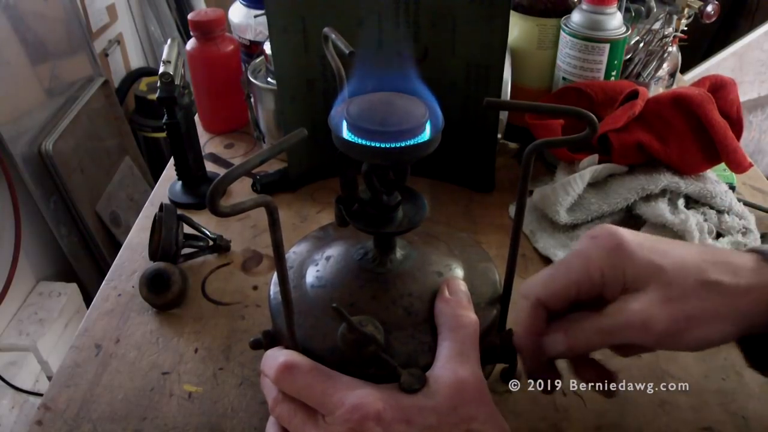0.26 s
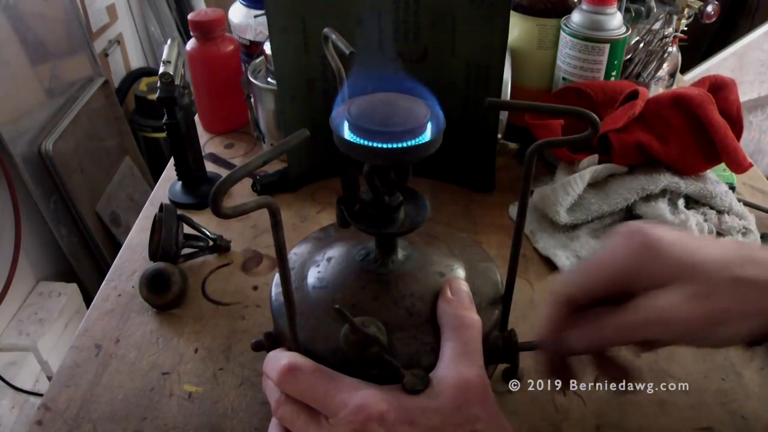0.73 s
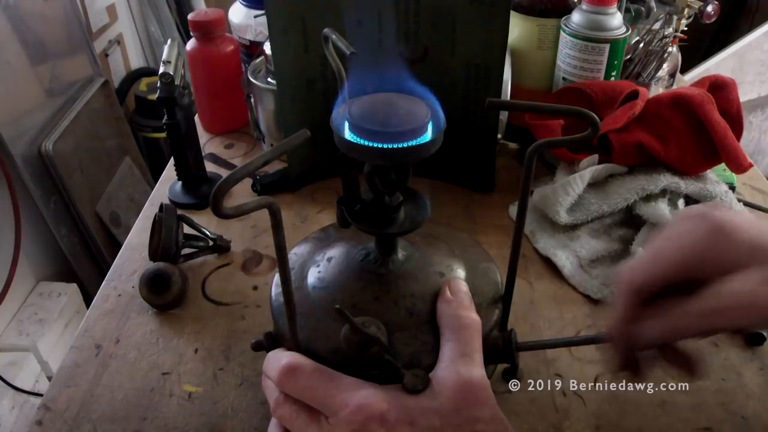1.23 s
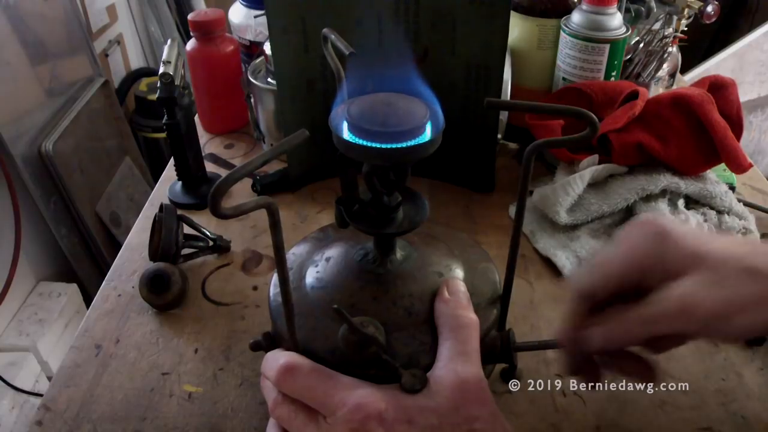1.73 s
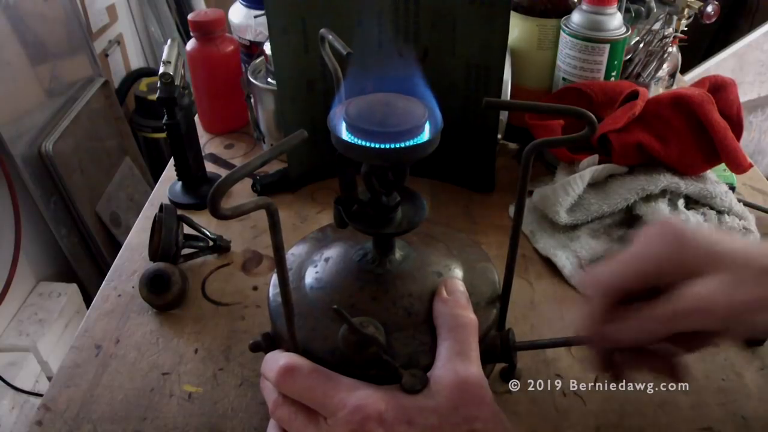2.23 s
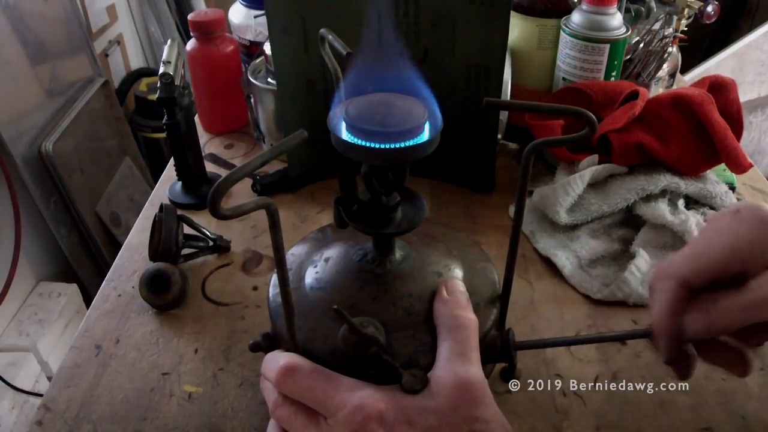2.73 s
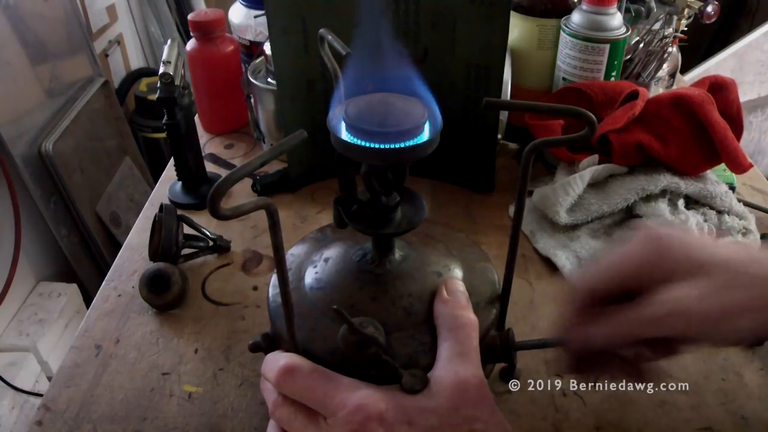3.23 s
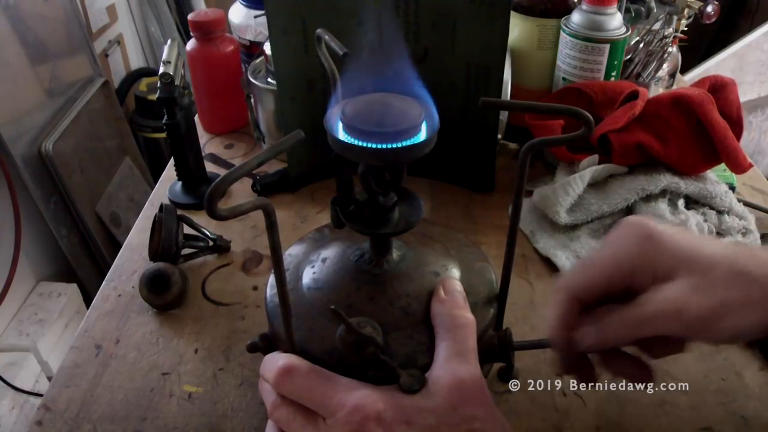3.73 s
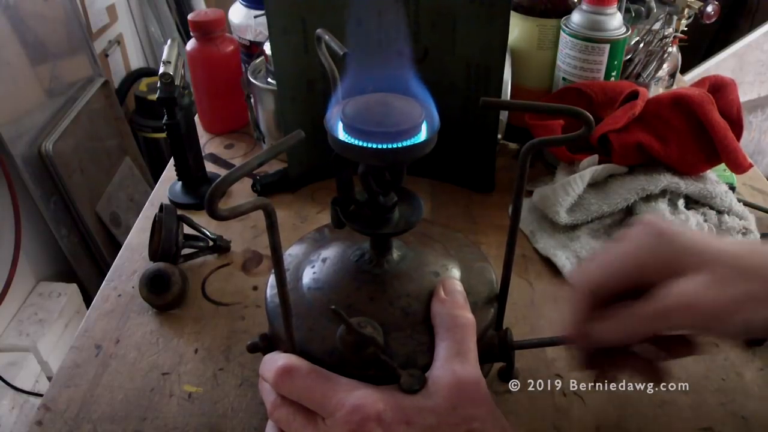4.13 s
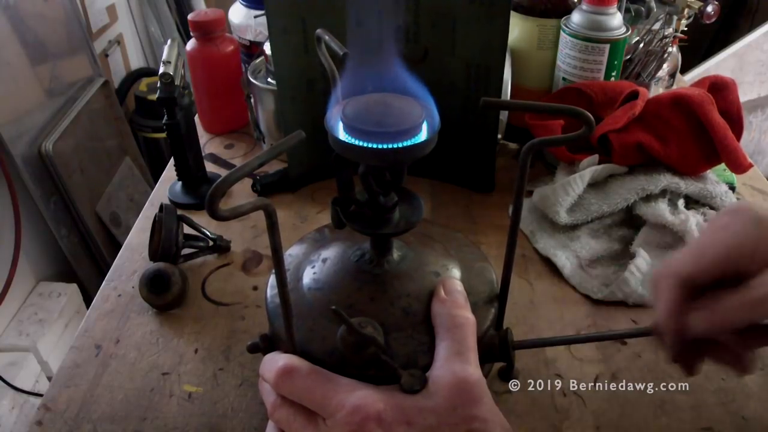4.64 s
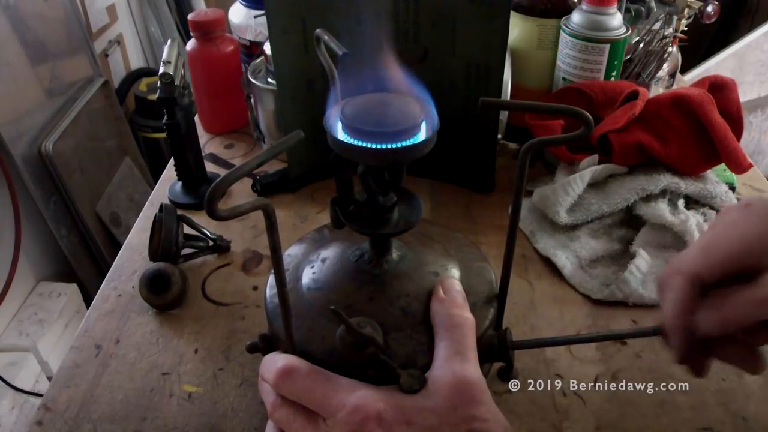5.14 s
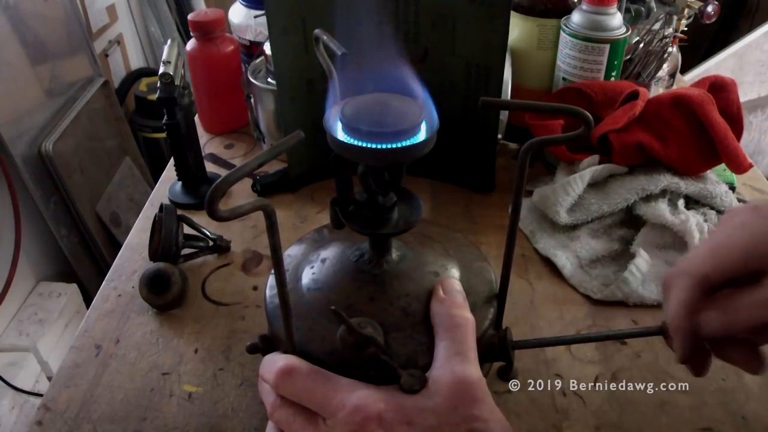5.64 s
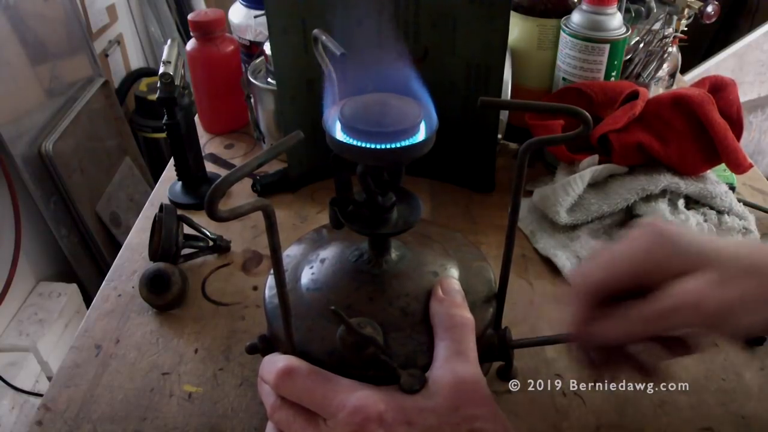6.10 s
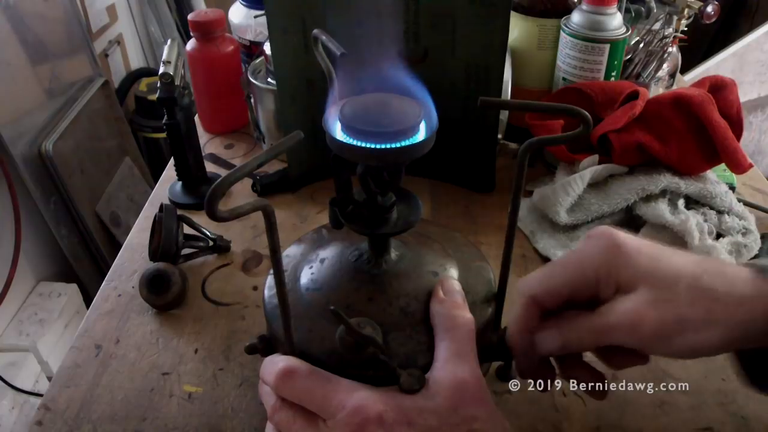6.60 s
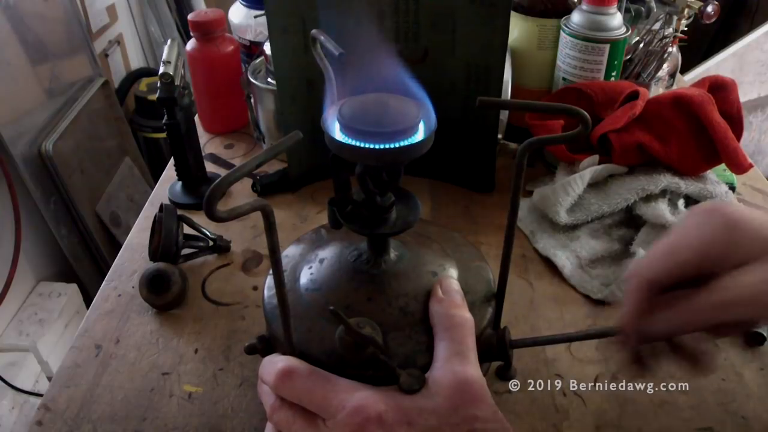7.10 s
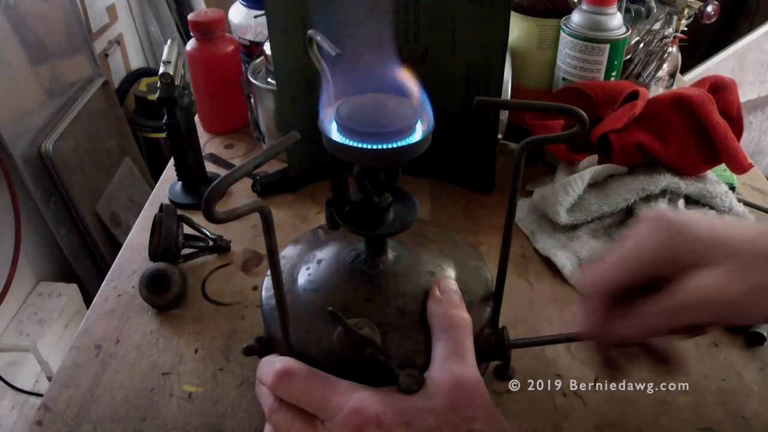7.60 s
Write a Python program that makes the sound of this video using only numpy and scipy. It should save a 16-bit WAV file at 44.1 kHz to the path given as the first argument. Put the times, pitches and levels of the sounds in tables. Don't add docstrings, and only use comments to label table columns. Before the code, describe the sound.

A loose pump rod rattles in its cap and guide, each contact chattering briefly and ringing the hollow tank, thin legs and tube. Strokes are quick and uneven: loud near the start, lighter ticking through the middle, hard clacks again near the end. Steady quiet burner hiss grows slightly over soft rumble; one close microphone, short room reflections, centred sound.

```python
import sys
import numpy as np
from scipy import signal
from scipy.fft import rfft, irfft, next_fast_len
from scipy.io import wavfile
from scipy.ndimage import uniform_filter1d, map_coordinates

SR = 44100
rng = np.random.default_rng(int(sys.argv[2]) if len(sys.argv) > 2 else 0)


def ratio(d):
    e = np.asarray(d, float) / 20
    return 10 ** e


def output_pcm(signal):
    pcm = np.clip(np.atleast_2d(signal).T, -1, 1) * 32767
    wavfile.write(sys.argv[1], SR, np.round(pcm).astype(np.int16))


N = 346626


def unit(x):
    return x / np.sqrt(np.mean(x ** 2) + 1e-20)


def along(points, hz):
    f, v = np.transpose(points)
    return np.interp(np.log(hz + 1), np.log(f + 1), v)


def wobble(rate):
    knots = rng.standard_normal(int(N * rate / SR) + 4)
    return map_coordinates(knots, [np.arange(N) * rate / SR])


def noise(gain, size=N):
    m = next_fast_len(size)
    spectrum = rfft(rng.standard_normal(m)) * gain(np.fft.rfftfreq(m, 1 / SR))
    return unit(irfft(spectrum, m)[:size])


def peaks(rows, hz):
    return np.sqrt(sum(ratio(db) ** 2 / (1 + (2 * (hz - c) / w) ** 2) for c, w, db in rows))


def band(lo_hz, hi_hz):
    return lambda hz: 1 / np.sqrt((1 + (lo_hz / (hz + 1)) ** 24) * (1 + (hz / hi_hz) ** 24))


def blank(seconds):
    t = np.arange(int(seconds * SR)) / SR
    return t, np.zeros(N + len(t))


def add_at(track, start_s, sound):
    track[max(round(start_s * SR), 0):][:len(sound)] += sound


# pitch_hz, t60_s
ROOM_DECAY = [(200, 0.4), (2000, 0.4), (10000, 0.23)]


def shop(x):
    hz, t, z = signal.stft(rng.standard_normal(SR // 2), SR, nperseg=256)
    fading = z * ratio(-60 * t / along(ROOM_DECAY, hz)[:, None])
    tail = signal.istft(fading, SR, nperseg=256)[1]
    late = np.pad(x, (300, 0))
    return signal.fftconvolve(late, tail / np.linalg.norm(tail))[:N]


# start_s, level_db
JET_LEVEL = [(0.0, -47.5), (1.09, -48), (2.49, -46), (3.63, -46.5), (3.98, -46.5), (4.14, -45.5),
             (5.51, -44), (6.87, -44.5), (7.11, -42), (7.35, -44.5), (7.86, -42.5)]
# pitch_hz, level_db (per Hz)
JET_COLOUR = [(700, -11), (1000, -7.5), (1300, -16.5), (1560, -9), (2300, -9.5), (3300, -6.5), (5000, -6.5),
              (5500, 0), (6700, -2), (8000, -1), (9200, 0), (9900, -12.5), (11500, -11), (15000, -18.5)]
# pitch_hz, width_hz, level_db (not used)
BURNER_CAVITIES = [(2456, 62, -8), (2776, 12, -10), (3350, 170, -8), (4130, 57, -8), (4520, 33, -9),
                   (5540, 14, -7), (6000, 20, -4), (5950, 17, -2), (6060, 21, -6), (6270, 36, -3),
                   (7140, 160, -2), (8150, 130, 0), (7940, 56, -4), (8840, 81, -3), (9090, 61, 0),
                   (9760, 39, -10), (10200, 15, -14), (13400, 93, -17)]
# pitch_hz, level_db (per Hz)
ROAR_COLOUR = [(8, -2), (30, 4.5), (45, -4), (62, -2), (80, -13), (120, -6.5), (160, -10), (260, -6.5),
               (400, -18), (900, -16), (1250, -39), (1600, -72)]
ROAR_DB = -55.5


def burner():
    cavities = [(c, w, 0) for c, w, _ in BURNER_CAVITIES]
    colour = lambda hz: ratio(along(JET_COLOUR, hz)) * (.8 + 1.2 * peaks(cavities, hz))
    start_s, level_db = np.transpose(JET_LEVEL)
    jet_db = np.interp(np.arange(N) / SR, start_s, level_db)
    jet = ratio(jet_db - 0.43 + 0.58 * wobble(3.27) + 1.1 * wobble(25)) * noise(colour)
    roar = ratio(ROAR_DB + 0.4 * wobble(3.71)) * noise(lambda hz: ratio(along(ROAR_COLOUR, hz)))
    return jet + roar


# start_s, level_db
BENCH_PUSHES = [
    (3.421, -56),
    (5.552, -58),
    (6.619, -62),
    (6.799, -56),
    (7.53, -50),
]


def thuds():
    t, out = blank(.3)
    for s, db in BENCH_PUSHES:
        swell_and_fade = ratio(db + 7 - 60 * t / 0.27) * (1 - np.exp(-t / 0.013))
        add_at(out, s, swell_and_fade * noise(band(42, 196), size=len(t)))
    return out[:N]


# pitch_hz, level_db, t60_s
TUBE_MODES = [(2735, -4, .07), (2905, 0, .06), (3065, -1, .055), (3235, -1, .06)]
TANK_MODES = [(665, -6, .07), (780, -7, .06), (886, -6, .04), (990, -4, .07), (1065, -6, .05),
              (1200, -8, .035)]
LEG_MODES = [(1555, -6, .07), (1605, -3, .07), (1690, -7, .08), (1790, -5, .07), (1957, -1, .07),
             (2075, 0, .06), (2200, -6, .06), (2303, -4, .06), (2470, -9, .05)]
BENCH_MODES = [(240, -4, .08), (345, -1, .09), (470, -2, .07), (570, -2, .09)]
# peak_s, level_db, tank_share_db
PLUNGER_DRAGS = [(0.0, -27, -24), (0.13, -40, -9.5), (0.55, -43, -19), (0.72, -40, -10), (1.4, -50, -7),
                 (1.87, -40, -11.5), (2.22, -41, -12), (2.5, -43, -9), (1.92, -59, -12), (2.14, -41.5, -9),
                 (2.56, -42, -10.5), (3.0, -53, 1), (3.75, -43.5, -7.5), (4.15, -42.5, -10),
                 (4.73, -42, -21), (4.88, -42.5, -6.5), (5.34, -42.5, -8.5), (5.58, -43, -8),
                 (5.72, -46, -4.5), (5.87, -36, -7.5), (6.5, -61, 9), (6.86, -49, -14), (7.03, -39, -13.5),
                 (7.181, -34.5, -12), (7.33, -50, 4.5), (7.6, -47, -6), (7.75, -56.5, 1)]
DRAG_FADE_DB_PER_S, DRAG_REST_DB = 125, -72


def slide():
    t = np.arange(N) / SR
    legs_db = np.full(N, float(DRAG_REST_DB))
    tank_db = legs_db.copy()
    for s, db, share in PLUNGER_DRAGS:
        near_db = db - DRAG_FADE_DB_PER_S * np.abs(t - s)
        legs_db = np.maximum(legs_db, near_db)
        tank_db = np.maximum(tank_db, near_db + share)

    def hum(modes, width_hz):
        rows = [(c, width_hz, db) for c, db, _ in modes]
        return noise(lambda hz: peaks(rows, hz) ** 2)

    grip = ratio(2.5 * wobble(40) + 4 * wobble(350))
    legs = ratio(legs_db - 11.5) * unit(grip * hum(LEG_MODES + TUBE_MODES, 110))
    tank = ratio(tank_db - 5.5) * unit(grip * hum(TANK_MODES + BENCH_MODES[1:], 47))
    return legs + tank


def struck(t, modes, clatter, best_hz, chatter, blur, rise=0.00025, spread_db=0.0):
    early = t < .02
    hz, mode_db, t60 = np.repeat(modes, 3, axis=0).T[:, :, None]
    draw = rng.standard_normal((3, len(hz), 1))
    aim_db = -np.minimum(np.abs(np.log(hz / best_hz)) * 130, 12) if best_hz else 0
    level = ratio(mode_db + aim_db + spread_db * draw[0] - 60 * t / t60)
    partials = level * np.sin(2 * np.pi * hz * (1 + blur * draw[1]) * t + np.pi * draw[2])
    ring = partials.sum(0) * (1 - np.exp(-t / (0.28 * chatter)))

    lo, hi, dense_db, dense_t60 = clatter
    jitter = uniform_filter1d(rng.standard_normal(len(t)), size=60) * np.sqrt(60)
    bounces = ratio(4.2 * jitter * np.exp(-t / chatter))
    fade = ratio(-60 * np.maximum(t - chatter / 2, 0) / dense_t60)
    dense = noise(band(lo, hi), size=len(t)) * bounces * (1 - np.exp(-t / rise)) * fade
    part = ring / np.std(ring[early]) + ratio(dense_db) * dense / np.std(dense[early])
    return part / np.std(part[early])


# start_s, pitch_hz, level_db
LOOSE_NOTES = [(0.0, 550, -45), (0.396, 345, -50), (0.9, 333, -50.5), (1.185, 1973, -40),
               (1.699, 3548, -32), (1.745, 337, -49), (2.094, 4520, -39), (2.43, 3270, -34),
               (2.803, 4050, -36), (3.98, 3970, -40), (4.111, 1580, -47.5), (4.329, 2590, -43.5),
               (4.82, 2110, -48), (4.831, 1560, -53), (5.379, 1750, -47.5), (5.54, 1560, -38),
               (6.801, 350, -45.5), (0.362, 1597, -37), (0.655, 3080, -26), (0.68, 585, -41),
               (1.001, 1610, -41), (1, 1273, -43), (2.149, 1610, -51), (3.72, 2080, -55),
               (5.797, 1512, -29), (6.416, 3620, -32), (6.803, 2115, -33), (7.535, 1290, -30.5),
               (7.536, 2068, -25.5), (0.0, 2140, -45), (0.51, 2055, -43), (0.656, 1647, -22.5),
               (0.656, 1105, -34), (0.656, 1310, -34), (0.999, 2090, -33.5), (1.699, 3770, -48),
               (2.262, 2907, -44), (2.428, 3990, -34), (3.115, 1590, -55), (4.72, 4100, -51),
               (4.885, 3050, -47), (5.214, 2915, -38), (5.328, 1546, -45), (5.54, 2276, -34),
               (5.799, 1240, -40.5), (6.153, 1605, -38.5), (6.414, 1790, -28), (1.699, 3200, -50),
               (5.213, 4170, -40.5), (6.488, 2500, -53), (6.803, 1613, -30), (6.803, 2275, -25),
               (6.802, 1270, -33.5), (7.15, 1100, -37), (7.326, 1060, -49), (6.565, 1070, -50),
               (7.538, 1640, -36), (7.536, 2291, -31.5), (5.539, 1240, -39), (5.797, 3010, -41),
               (1.391, 1654, -52)]
PING_WIDTH = .045


def pings():
    t, out = blank(.2)
    for s, hz, db in LOOSE_NOTES:
        t60 = .04 if 1050 < hz < 1400 else .085
        rattle = (hz * (1 - PING_WIDTH), hz * (1 + PING_WIDTH), 0, t60)
        note = struck(t, [(hz, 0, t60)], rattle, 0, chatter=0.0097, blur=0.0017)
        add_at(out, s, ratio(db - 2.5) * note)
    return out[:N]


# start_s, tank_db, near_leg_db, far_leg_db, leg_brace_db
BODY_RINGS = [(0.0, -52, -53, -52, -58), (0.361, -60, -56, -54, -56), (0.509, -78, -51, -64, -78),
              (0.654, -39, -48, -38, -44), (0.761, -55, -62, -63, -60), (0.998, -56, -62, -62, -59),
              (1.184, -78, -50, -62, -78), (1.433, -61, -78, -71, -78), (1.698, -60, -61, -78, -67),
              (1.84, -65, -62, -56, -74), (2.094, -60, -78, -78, -78), (2.263, -55, -72, -54, -78),
              (2.43, -57, -57, -59, -78), (2.577, -63, -72, -78, -78), (2.805, -60, -53, -67, -78),
              (3.193, -78, -60, -62, -78), (3.392, -60, -78, -78, -78), (3.979, -56, -56, -68, -78),
              (4.1, -78, -65, -72, -59), (4.528, -57, -63, -66, -78), (4.719, -68, -54, -78, -78),
              (5.212, -63, -57, -78, -78), (5.328, -59, -61, -71, -60), (5.539, -58, -52, -52, -52),
              (5.797, -49, -60, -53, -58), (6.15, -78, -63, -61, -58), (6.26, -68, -55, -64, -78),
              (6.415, -45, -47, -54, -54), (6.565, -55, -55, -78, -74), (6.8, -54, -50, -42, -46),
              (6.978, -74, -55, -70, -66), (7.149, -43, -48, -47, -56), (7.325, -58, -65, -65, -78),
              (7.534, -50, -43, -42, -44), (7.717, -78, -54, -78, -71)]
# pitch_hz, split_hz, t60_s, phase_waver_rad
BODY_LONG_MODES = [
    (887, 3, .36, .12),
    (1957, 7, .16, .45),
    (2170, 9, .2, .35),
    (1648, 9, .28, .4),
]
# start_s, pump_tube_db, pump_leg_db
PUMP_RINGS = [(0.0, -57, -51), (0.361, -61, -62), (0.509, -78, -57), (0.654, -42, -50), (0.761, -61, -66),
              (0.998, -78, -58), (1.184, -78, -61), (1.698, -56, -78), (2.263, -55, -70), (4.1, -66, -59),
              (5.212, -57, -78), (5.328, -68, -60), (5.539, -59, -61), (5.797, -53, -54), (6.415, -56, -55),
              (6.8, -50, -50), (6.978, -76, -61), (7.149, -56, -55), (7.534, -53, -47)]
# pitch_hz, split_hz, t60_s, phase_waver_rad
PUMP_LONG_MODES = [
    (2738, 6, .22, .4),
    (2075, 14, .22, .35),
]


def rings(rows, modes, trim_db=-2.5):
    t, out = blank(.4)
    hz, split, t60, waver = np.transpose(modes)[:, :, None]
    swell = 1 - np.exp(-t / .004)
    for s, *levels in rows:
        draw = rng.uniform(-1, 1, (2, len(modes), 1))
        beat = 2 * np.pi * split * (1 + .2 * draw[1]) * t
        turn = 2 * np.pi * hz * t + np.pi * draw[0]
        shake = uniform_filter1d(rng.standard_normal(turn.shape), size=300)
        turn = turn + waver * unit(uniform_filter1d(shake, size=300))
        pair = np.sin(turn - beat) + .6 * np.sin(turn + beat)
        level = ratio(np.array(levels)[:, None] + trim_db - 60 * (t - .055) / t60)
        add_at(out, s, np.sum(level * pair, axis=0) * swell)
    return out[:N]


# start_s, legs_db, bench_db, tube_db, cap_db
ROD_BLOWS = [(0.0, -24, -56, -31, -32.5), (0.1358, -32.5, -41, -41, -47),
             (0.3604, -24.5, -37.5, -22.5, -48), (0.6545, -9.5, -26, -20, -17),
             (0.9983, -31, -39, -25.5, -62), (1.4332, -38.5, -43, -35, -40),
             (2.2619, -32.5, -32.5, -21.5, -30), (2.97, -34, -68, -39.5, -41),
             (4.527, -38, -39.5, -32.5, -46), (5.4147, -37, -38.5, -32.5, -44),
             (5.5397, -17, -39, -25, -37.5), (5.7983, -20.5, -39, -20.5, -32.5),
             (6.1495, -25.5, -37, -26, -61), (6.414, -19.5, -39, -25.5, -34.5),
             (6.564, -27.5, -34.5, -31, -40), (6.801, -15.5, -34, -23.5, -30),
             (7.15, -16.5, -41, -22.5, -18.5), (7.3241, -33, -36, -25.5, -37.5),
             (7.535, -10.5, -31, -20.5, -27.5)]
# start_s, level_db, best_struck_hz, guide_db, legs_db
CAP_TICKS = [(0.5077, -25, 8900, -39.5, -26), (0.76, -35, 6420, -41, -37),
             (1.1817, -23.5, 9000, -37.5, -25), (1.6971, -22.5, 8400, -31, -34),
             (2.0941, -24, 7200, -36, -40), (2.428, -24, 8800, -31.5, -52), (2.557, -34, 9000, -60, -35),
             (2.802, -29.5, 5460, -33, -35), (3.192, -31, 6230, -37, -36.5),
             (3.569, -33, 8300, -34.5, -35.5), (3.9791, -22.5, 9250, -32, -30),
             (4.3258, -29, 7700, -41.5, -39), (4.718, -27, 6330, -33, -28), (5.2099, -21.5, 8800, -31, -32),
             (5.6423, -30, 8450, -41.5, -36), (6.259, -24.5, 6170, -32.5, -25),
             (6.977, -27.5, 9200, -37, -27), (7.2346, -36, 6370, -34.5, -31.5),
             (7.7135, -29, 8800, -40, -26.5)]
BODY_LAG_S = 0.002061
CAP_STARTS_HZ = 7500
CAP_SPARED_DB, ROD_SPARED_DB = -2.5, -2
GUIDE_GRIPS_DB, GRIP_DAMPS = -10.5, 4.5
ROD_IN_BLOW_DB, GUIDE_UNDER_TUBE_DB, GUIDE_UNDER_LEGS_DB = -3.5, -5, -10.5


def rod_contacts():
    contacts = []
    for s, db, hz, guide, _ in CAP_TICKS:
        grip_db = GRIP_DAMPS * max(guide - db - GUIDE_GRIPS_DB, 0)
        cap = db + CAP_SPARED_DB * (hz < CAP_STARTS_HZ)
        rod = db + (ROD_SPARED_DB - grip_db) * (hz > CAP_STARTS_HZ)
        contacts.append((s, cap, rod, guide, hz))
    for s, legs, _, tube, cap in ROD_BLOWS:
        rod = (cap + tube) / 2 + ROD_IN_BLOW_DB
        guide = min(tube + GUIDE_UNDER_TUBE_DB, legs + GUIDE_UNDER_LEGS_DB)
        contacts.append((max(s - BODY_LAG_S / 2, 0), cap, rod, guide, 0))
    return contacts


# pitch_hz, level_db, t60_s
CAP_MODES = [(7710, -3, .07), (7900, 0, .08), (8088, 0, .07), (8310, -3, .06), (8680, -1, .06),
             (8862, 2, .06), (9030, 3, .055), (9190, -3, .05)]
ROD_MODES = [(5430, -6, .06), (5706, -3, .07), (5865, 0, .07), (6065, -1, .07), (6240, 0, .07),
             (6360, 0, .09), (6455, -2, .07), (6830, -4, .08), (7150, -3, .08), (7340, -3, .08)]
GUIDE_MODES = [(3400, -3, .07), (3550, 0, .08), (3785, -5, .07), (3955, 0, .1), (4055, 0, .08),
               (4200, -3, .07), (4580, -2, .08), (4760, -6, .07)]
# low_hz, high_hz, level_db (against the modes), t60_s
BRIGHT_CLATTER = [
    (7880, 9300, -6.5, 0.13),
    (4910, 7600, 0.5, 0.12),
    (3220, 4400, 5, 0.051),
]
# pitch_hz, level_db (per Hz)
SHEEN_COLOUR = [(9000, -120), (9600, -15), (10500, -6), (12500, 6), (14000, 3), (15000, -16)]


def clicks():
    t, out = blank(.2)
    sheen_shape = (1 - np.exp(-t / 0.0007)) * ratio(-60 * t / 0.034)
    for s, cap_db, rod_db, guide_db, best_hz in rod_contacts():
        levels, aims = (cap_db, rod_db, guide_db), (best_hz, best_hz, 0)
        hit = ratio(cap_db - 20) * sheen_shape * noise(lambda hz: ratio(along(SHEEN_COLOUR, hz)), size=len(t))
        for db, modes, dense, best in zip(levels, (CAP_MODES, ROD_MODES, GUIDE_MODES), BRIGHT_CLATTER, aims):
            part = struck(t, modes, dense, best, chatter=0.014, blur=0.003, spread_db=3.5)
            hit = hit + ratio(db - 6.5) * part
        add_at(out, s, hit)
    return out[:N]


# start_s, legs_db, tank_db, bench_db
LIGHT_SCUFFS = [(0.8348, -34.5, -40, -47), (0.8948, -55, -71, -42.5), (1.3583, -40, -48, -75),
                (1.389, -38, -43, -58), (1.76, -40, -47, -41), (1.8122, -45, -49, -63),
                (1.8408, -32.5, -42, -52), (1.9079, -38.5, -43, -40), (2.1985, -37.5, -46, -65),
                (2.4752, -39, -36, -44), (2.855, -40, -37, -49), (2.9446, -39, -47, -65),
                (3.11, -43, -72, -72), (3.3492, -39, -46, -62), (3.39, -39.5, -36.5, -37),
                (3.6706, -37.5, -45, -50), (4.099, -36, -45, -52), (4.1663, -50, -51, -33.5),
                (4.4723, -39.5, -66, -56), (4.4918, -38, -40.5, -59), (4.884, -50, -51, -68),
                (5.2743, -39, -42, -55), (5.3285, -42, -46, -65), (7.512, -62, -55, -34.5)]
SCUFF_TUBE_DB = -6.5
TANK_UNDER_LEGS_DB, TANK_UNDER_BENCH_DB = -9.5, 4.5
TICK_TUBE_DB, TICK_TANK_DB, TICK_BENCH_DB = -1.5, -7, -11
LEGS_STRUCK_HZ, LEGS_TICKED_HZ = 2075, 1957


def body_blows():
    contacts = []
    for s, legs, bench, tube, _ in ROD_BLOWS:
        tank = max(legs + TANK_UNDER_LEGS_DB, bench + TANK_UNDER_BENCH_DB)
        contacts.append((s, legs, tank, bench, tube, LEGS_STRUCK_HZ))
    for s, _, _, guide, legs in CAP_TICKS:
        tank = min(guide + TICK_TANK_DB, legs + TANK_UNDER_LEGS_DB)
        bench, tube = guide + TICK_BENCH_DB, guide + TICK_TUBE_DB
        contacts.append((s + BODY_LAG_S, legs, tank, bench, tube, LEGS_TICKED_HZ))
    for s, legs, tank, bench in LIGHT_SCUFFS:
        contacts.append((s, legs, tank, bench, max(legs, bench) + SCUFF_TUBE_DB, 0))
    return contacts


# low_hz, high_hz, level_db (against the modes), t60_s
STOVE_CLATTER = [
    (1510, 2450, -3.5, .09),
    (620, 1150, -3, .07),
    (220, 620, 0, .08),
    (2650, 3400, -2, .09),
]


def knocks(lead_s=0.001201):
    t, out = blank(.3)
    part_modes = (LEG_MODES, TANK_MODES, BENCH_MODES, TUBE_MODES)
    thwack = (1 - np.exp(-t / 0.003)) / (1 + (t / 0.008) ** 4)
    for s, legs_db, tank_db, bench_db, tube_db, legs_hz in body_blows():
        levels = (legs_db, tank_db, bench_db, tube_db)
        scrape_s = .03 * np.clip((-34 - max(legs_db, tube_db)) / 6, 0, 1)
        wide = ratio(min(legs_db - 15, tank_db - 2)) * noise(band(600, 3400), size=len(t))
        wide = wide + ratio(tank_db - 15) * noise(band(8300, 12300), size=len(t))
        hit = thwack * wide
        for db, modes, dense, best in zip(levels, part_modes, STOVE_CLATTER, (legs_hz, 0, 0, 0)):
            part = struck(t, modes, dense, best, chatter=0.022 + scrape_s, blur=0.0044, spread_db=2.5)
            hit = hit + ratio(db - 13.5) * part
        add_at(out, s - lead_s, hit)
    return out[:N]


def scene():
    pump = knocks() + clicks() + pings()
    singing = rings(BODY_RINGS, BODY_LONG_MODES) + rings(PUMP_RINGS, PUMP_LONG_MODES)
    room = shop(ratio(-12.0) * pump + ratio(-20) * singing)
    mono = burner() + thuds() + slide() + room + singing + pump
    return np.array([mono, mono])


def top_cut(x):
    return signal.sosfilt(signal.butter(12, 15430, fs=SR, output="sos"), x)


def record(dry):
    dry = dry / (1 + np.abs(dry / .56) ** 4) ** .25
    m = next_fast_len(N)
    hz = np.fft.rfftfreq(m, 1 / SR)
    dip = 1 - .8 / (1 + ((hz - 1470) / 50) ** 2)
    band_limit = 1 / (1 + (hz / 14990) ** 500)
    mix = irfft(rfft(dry, m) * dip * band_limit, m)[:, :N] + 0.00026
    return top_cut(mix)


dry = scene()
out = record(dry)
output_pcm(out)
```